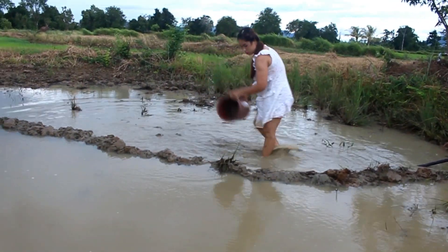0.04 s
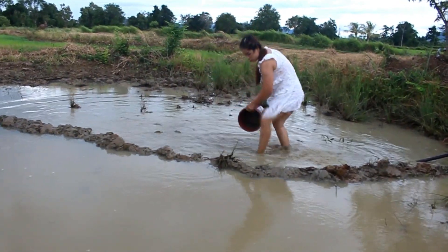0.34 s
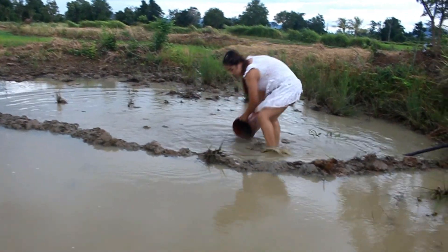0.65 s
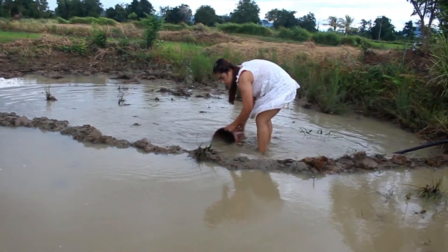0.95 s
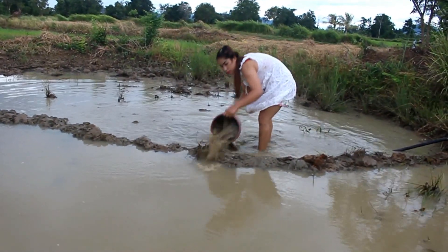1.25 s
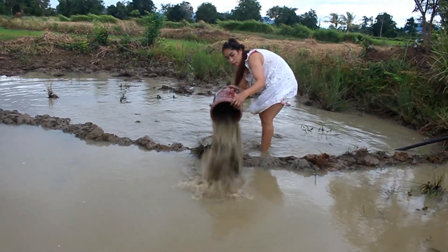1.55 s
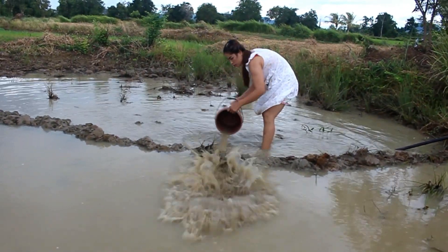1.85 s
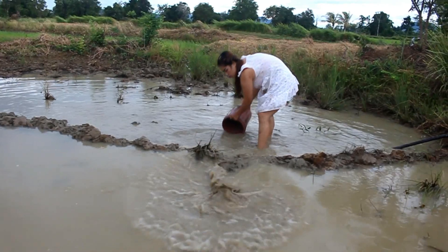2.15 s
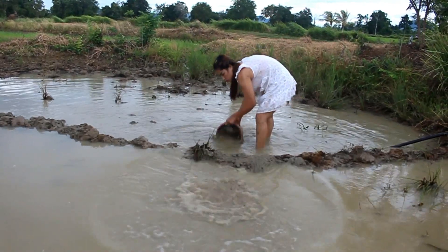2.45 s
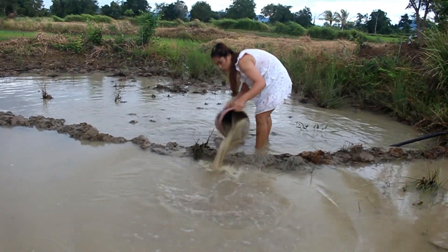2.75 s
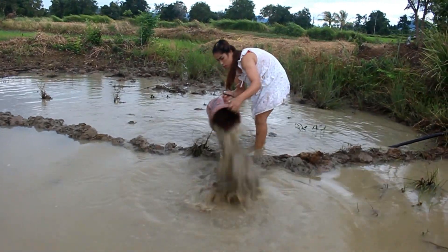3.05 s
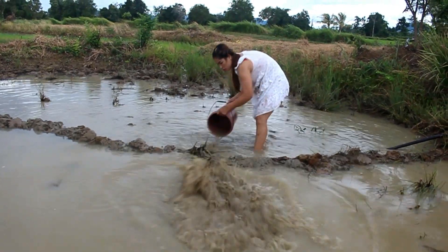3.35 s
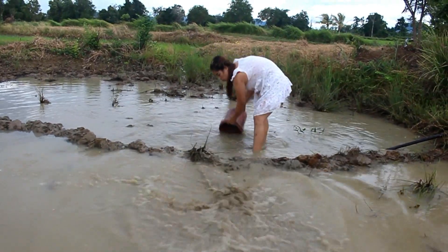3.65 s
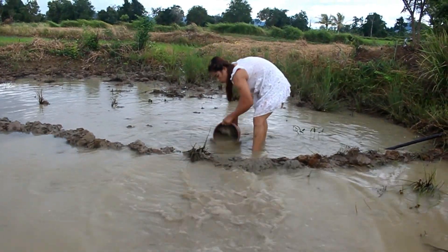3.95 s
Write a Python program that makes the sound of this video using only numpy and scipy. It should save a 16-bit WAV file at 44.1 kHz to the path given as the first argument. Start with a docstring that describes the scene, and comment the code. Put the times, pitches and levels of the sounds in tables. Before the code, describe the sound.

Water splashes down twice from a plastic bucket that knocks as it scoops, outdoors.

```python
"""Someone wades through a flooded field, the water churning and gulping, while wind buffets the microphone.
At 1.1 s a plastic bucket knocks as it is plunged in; its muddy load slides out and crashes down as
spray, slaps and bubbles. A louder knock at 2.3 s leads to a second throw, and at 3.8 s the bucket
goes in again. The recorder's gain ducks after the loud peaks of the knocks and recovers slowly."""
import sys
import numpy as np
from scipy import signal
from scipy.fft import rfft, irfft, next_fast_len
from scipy.io import wavfile

SR = 44100
rng = np.random.default_rng(int(sys.argv[2]) if len(sys.argv) > 2 else 0)


def materialize(psi):
    """Save the field psi as 16-bit PCM at rate SR to the path in sys.argv[1].

    A 1-D psi becomes a single channel; in a 2-D psi each row is a channel.
    """
    bounded = np.clip(np.atleast_2d(psi).T, -1, 1)
    quanta = np.round(bounded * 32767).astype(np.int16)
    wavfile.write(sys.argv[1], SR, quanta)


N = 176400
T = np.arange(N) / SR

# Each row: start in seconds, wall in dB, splash in dB, hollow pitch in Hz, hollow in dB,
# hollow t60 in seconds.
BUCKET_KNOCKS = [(1.1086, -9.5, -11.5, 272, -1.5, 0.045), (2.3048, 7.5, -8, 212, 0, .11),
                 (3.7933, 5.5, -14.5, 174, -3.5, 0.097)]
# Each row: delay within a knock in seconds, level in dB.
KNOCK_CONTACTS = [(0, -2.5), (.0043, 0), (.011, -6), (.017, -7.5)]
# Each row: frequency in Hz, relative level in dB, t60 in seconds.
WALL_MODES = [(878, -12.5, 0.08), (994, -17, .07), (1383, -6.5, 0.037), (1479, -3, 0.074),
              (1600, -4.5, 0.039), (1900, -7.5, 0.031), (2100, -11, 0.058), (2500, -13.5, 0.074),
              (2810, -11, 0.067), (3050, -13, .055), (3400, -9.5, 0.076), (3460, -6.5, 0.026),
              (3730, -14, 0.065), (4200, -31, 0.16)]
WALL_ROUGHNESS, FLUTTER_WIDTH_HZ = 0.32, 140
CRACK_DB, CRACK_T60_S, SPLASH_T60_S, HOLLOW_DELAY_S = 10, 0.0021, 0.092, 0.0032


def bucket():
    """Rim and side hit the water in turn: the loaded wall rings unevenly, splashes, the hollow booms."""
    out, t = np.zeros(N), T[:SR // 4]
    for start, wall_db, splash_db, hollow_hz, hollow_db, hollow_t60 in BUCKET_KNOCKS:
        for delay, contact_db in KNOCK_CONTACTS:
            wall = 0
            for hz, mode_db, t60 in WALL_MODES:
                flutter = rms_one(resonate(rng.standard_normal(len(t)), hz, FLUTTER_WIDTH_HZ))
                tone = np.sin(2 * np.pi * (hz * t + rng.random()))
                wall += from_db(mode_db) * fade(t60) * (tone + WALL_ROUGHNESS * flutter)
            splash = spatter() * (from_db(CRACK_DB) * fade(CRACK_T60_S) + fade(SPLASH_T60_S))
            contact = from_db(wall_db) * wall / 2 + from_db(splash_db) * splash
            add(out, start + delay, from_db(contact_db) * contact)
        add(out, start + HOLLOW_DELAY_S, from_db(hollow_db) * bubble(hollow_hz, hollow_t60, rise=0.015))
    return out


# Each row: frequency in Hz, relative density in dB.
SPRAY_SPECTRUM = [(400, -17), (1000, -11.5), (1600, -6), (2300, -5.5), (3400, 0), (4300, -3.5), (5300, -15),
                  (6600, -15), (8000, -9.5), (9300, -14), (12000, -26), (15500, -42)]
DROPS_DB, DROPS_PER_S, DROP_Q, DROP_SPREAD_DB, SPRAY_FLICKER_DB = -1.5, 1800, 4, 3.5, 1.32


def spray(level_db):
    """Thousands of drops ring for a few cycles each, over a smooth mist of the finest ones."""
    density = from_db((level_db - level_db.mean()) / 2)
    impacts = clicks(DROPS_PER_S * density, DROP_SPREAD_DB)
    pitches_hz = np.geomspace(900, 15000, 24)
    band = rng.integers(0, len(pitches_hz), N)
    drops = sum(resonate(impacts * (band == k), hz, hz / DROP_Q) for k, hz in enumerate(pitches_hz))
    drops = colour(drops / np.sqrt(density), SPRAY_SPECTRUM)  # same power at any density
    mist = colour(rng.standard_normal(N), SPRAY_SPECTRUM)
    return from_db(level_db + SPRAY_FLICKER_DB * drift(26)) * (from_db(DROPS_DB) * drops + mist)


def spatter():
    """A quarter second of noise with the colour of spray."""
    return colour(rng.standard_normal(SR // 4), SPRAY_SPECTRUM)


# Each row: start in seconds, level in dB, ring in Hz, t60 in seconds.
SURFACE_SLAPS = [(.1725, -23, 2030, 0.053), (.3207, -19, 1900, 0.04), (.5053, -21, 2400, 0.063),
                 (.63, -21, 1830, 0.048), (.683, -20, 3000, 0.024), (.747, -26, 3000, .04),
                 (.768, -26, 4200, .03), (.8031, -13.5, 2100, 0.035), (.822, -20.5, 9000, .05),
                 (.891, -27, 4000, .03), (.925, -31, 9000, .03), (.954, -27, 2500, .04),
                 (1.3917, -22, 2940, 0.039), (1.6402, -12, 3380, 0.059), (1.654, -12.5, 1680, 0.053),
                 (1.6651, 0.5, 3500, 0.018), (2.04, -18, 8100, 0.029), (2.238, -18.5, 3000, .07),
                 (2.3778, -19, 2460, 0.04), (2.4853, -16, 3400, 0.051), (2.563, -17, 3020, 0.077),
                 (2.7616, -15.5, 4100, 0.033), (2.856, -19.5, 3700, 0.098), (2.8918, -15, 3000, 0.043),
                 (2.906, -18, 3500, 0.021), (3.053, -17, 3400, .04), (3.0904, -11, 3400, 0.025),
                 (3.2061, -23, 2620, 0.16), (3.2879, -12, 2960, 0.056), (3.297, -10, 3400, 0.043),
                 (3.3717, -18.5, 3500, 0.084), (3.4524, -8, 2950, 0.02), (3.4619, -10, 8650, 0.019),
                 (3.862, -22, 1500, 0.11), (3.957, -23.5, 900, .06), (3.975, -24, 1600, 0.05)]
SLAP_RING_DB, SLAP_WIDTH_HZ, SLAP_ATTACK_S = -1, 430, 0.00088


def slaps():
    """Lumps of water hit the surface, each a sharp burst of spray with a short ring."""
    out = np.zeros(N)
    attack = 1 - np.exp(-T[:SR // 4] / SLAP_ATTACK_S)
    for start, db, hz, t60 in SURFACE_SLAPS:
        burst = spatter() * attack
        ring = from_db(SLAP_RING_DB) * rms_one(resonate(burst, hz, SLAP_WIDTH_HZ))
        add(out, start, from_db(db) * fade(t60) * rms_one(burst + ring))
    return out


# Each row: start in seconds, level in dB, pitch in Hz, t60 in seconds.
AIR_POCKETS = [(.182, -17, 680, 0.036), (0.2116, -15, 700, 0.031), (.278, -22.5, 600, 0.073),
               (.312, -20.5, 800, 0.043), (.488, -19.5, 870, 0.048), (.757, -21, 380, .06),
               (.862, -18.5, 660, 0.022), (1.11, -3, 440, .04), (1.1105, -3, 651, .055),
               (1.405, -23, 660, 0.1), (1.757, -16.5, 790, 0.048), (1.777, -24, 770, .06),
               (1.815, -16, 723, 0.052), (1.823, -9, 276, 0.037), (1.83, -14, 391, 0.073),
               (2.03, -18.5, 800, 0.05), (2.565, -11, 765, 0.044), (2.583, -13, 610, 0.037),
               (2.59, -23, 392, 0.077), (2.607, -20, 895, 0.075), (3.215, -19, 820, 0.057),
               (3.247, -18.5, 420, .06), (3.28, -16, 823, 0.064), (3.41, -20, 640, 0.06),
               (3.526, -19, 412, 0.045), (3.56, -20.5, 784, 0.047), (3.619, -18.5, 447, .08),
               (3.652, -14, 340, .08)]
GULP_RISE, GULP_SLOSH_DB, GULP_WIDTH_HZ = 0.1, -8, 310


def gulps():
    """Big bubbles ring behind the legs, the bucket and the falling water, each in a short slosh."""
    out = np.zeros(N)
    for start, db, hz, t60 in AIR_POCKETS:
        add(out, start, from_db(db) * bubble(hz, t60, GULP_RISE))
        band = resonate(rng.standard_normal(SR // 4), hz, GULP_WIDTH_HZ)
        slosh = rms_one(resonate(band, hz, GULP_WIDTH_HZ))
        add(out, start, from_db(db + GULP_SLOSH_DB) * slosh * fade(1.38 * t60))
    return out


# Each row: frequency in Hz, relative density in dB.
SLOSH_SPECTRUM = [(150, -15.5), (300, -5.5), (480, -5.5), (720, 1), (920, 1), (1150, -6), (1500, -1),
                  (2100, -14), (3500, -23.5), (15000, -53)]
SLOSH_FLICKER_DB = 2.5
BUBBLES_DB, BUBBLES_PER_S, BUBBLE_RANGE_DB = -7.5, 260, 18
BUBBLE_LOW_HZ, BUBBLE_HIGH_HZ, BUBBLE_T60_CYCLES, BUBBLE_RISE = 600, 2200, 28, 0.19


def churning(level_db):
    """Stirred water sloshes and traps small bubbles."""
    slosh = colour(rng.standard_normal(N), SLOSH_SPECTRUM) * from_db(SLOSH_FLICKER_DB * drift(29))
    bubbles = np.zeros(N)
    for when, pitch, softness in rng.random((int(BUBBLES_PER_S * N / SR), 3)):
        hz = BUBBLE_LOW_HZ * (BUBBLE_HIGH_HZ / BUBBLE_LOW_HZ) ** pitch
        ring = bubble(hz, BUBBLE_T60_CYCLES / hz, BUBBLE_RISE)
        add(bubbles, when * N / SR, from_db(-BUBBLE_RANGE_DB * softness) * ring)
    return from_db(level_db) * (slosh + from_db(BUBBLES_DB) * rms_one(bubbles))


DROPLETS_DB, DROPLETS_PER_S, DROPLET_RANGE_DB = -8.5, 170, 36
DROPLET_LOW_HZ, DROPLET_HIGH_HZ, DROPLET_T60_CYCLES = 1406, 9420, 33


def droplets(level_db):
    """Single drops stand out of the spray as tiny rising pings."""
    pings = np.zeros(N)
    for when, pitch, softness in rng.random((int(DROPLETS_PER_S * N / SR), 3)):
        hz = DROPLET_LOW_HZ * (DROPLET_HIGH_HZ / DROPLET_LOW_HZ) ** pitch
        ping = hz * bubble(hz, DROPLET_T60_CYCLES / hz, BUBBLE_RISE)  # weighted toward the treble
        add(pings, when * N / SR, from_db(-DROPLET_RANGE_DB * softness) * ping)
    return from_db(DROPLETS_DB + level_db) * colour(pings, SPRAY_SPECTRUM)


# Each row: centre in seconds, Gaussian sigma in seconds, level in dB.
SHEET_SWELLS = [(.36, 0.16, -44.5), (0.826, 0.027, -37), (1.35, 0.08, -36), (1.662, 0.045, -32.5),
                (2.04, 0.029, -34), (2.54, 0.016, -34), (2.72, 0.063, -35.5), (2.866, 0.034, -30.5),
                (3.06, 0.034, -33.5), (3.242, .07, -30.5)]
# Each row: frequency in Hz, relative density in dB.
FIZZ_SPECTRUM = [(2500, -22), (5000, -13), (6500, -6), (8200, 6.5), (10000, -3.5), (12500, -11.5),
                 (15500, -33)]
FIZZ_PER_S, FIZZ_SPREAD_DB, FIZZ_FLICKER_DB = 1400, 1.5, 2.9


def sheets():
    """Water runs off rim and legs or fans out in thin sheets that tear into fine, bright crackle."""
    swell = sum(from_db(db) * np.exp(-.5 * ((T - centre) / sigma) ** 2)
                for centre, sigma, db in SHEET_SWELLS)
    fizz = colour(clicks(FIZZ_PER_S, FIZZ_SPREAD_DB), FIZZ_SPECTRUM)
    return swell * fizz * from_db(FIZZ_FLICKER_DB * drift(40))


# Each row: time in seconds, rumble level in dB.
WIND_LEVELS = [(0, -29), (.04, -26), (.25, -31), (.34, -33), (.47, -33.5), (.78, -22), (.88, -31.5),
               (1.06, -20.5), (1.16, -30.5), (1.8, -31), (2.29, -31), (2.39, -35.5), (2.5, -28.5),
               (2.77, -28), (2.87, -35), (3.29, -25.5), (3.4, -30), (3.52, -23), (3.85, -22.5), (4.0, -26)]
# Each row: frequency in Hz, relative density in dB.
RUMBLE_SPECTRUM = [(20, -27), (40, -5), (62, -1.5), (115, 0.5), (160, -6), (250, -9), (400, -21),
                   (800, -30), (2000, -36), (15000, -90)]
# Each row: centre in seconds, peak in dB, pitch in Hz, length in seconds.
WIND_EDDIES = [(0.046, -13.5, 129, .012), (0.067, -12, 75, 0.023), (.165, -15.5, 110, 0.031),
               (.238, -14, 95, 0.02), (0.336, -19.5, 50.3, .03), (0.684, -20, 122, 0.022),
               (.765, -18.5, 184, 0.018), (0.795, -18, 130, 0.018), (1.035, -14.5, 103, .026),
               (1.077, -18.5, 140, 0.026), (3.473, -10, 151, 0.0033), (3.493, -11.5, 137, 0.016),
               (3.538, -11, 201, 0.023), (3.572, -14, 164, 0.0085), (3.599, -10, 160, 0.0076),
               (3.626, -9.5, 251, 0.0074), (3.634, -5.5, 140, 0.01), (3.66, -19.5, 332, 0.023),
               (3.69, -29, 260, .02), (3.764, -16, 298, 0.00875), (3.776, -9.5, 178, 0.0072),
               (3.985, -19, 212, 0.025)]
WIND_TRIM_DB, WIND_FLICKER_DB = 0.5, 1.5


def wind():
    """Lumpy rumble, with single eddies that briefly thump the microphone."""
    level_db = WIND_TRIM_DB + np.interp(T, *np.transpose(WIND_LEVELS))
    out = colour(rng.standard_normal(N), RUMBLE_SPECTRUM)
    out *= from_db(level_db + WIND_FLICKER_DB * drift(36))
    for centre, db, hz, length in WIND_EDDIES:
        t = T[:int(4 * length * SR)] - 2 * length
        eddy = np.sin(2 * np.pi * (hz * t + rng.random()) + .5 * drift(90)[:len(t)])
        add(out, centre - 2 * length, from_db(db) * eddy * np.exp(-2 * (t / length) ** 2))
    return out


def bubble(hz, t60, rise):
    """A dying sine whose pitch rises as the air nears the surface."""
    t = T[:int(min(t60, .25) * SR)]
    tone = np.sin(2 * np.pi * hz * t * (1 + rise * t / t60))
    attack = 1 - np.exp(-2 * hz * t)
    return tone * attack * np.exp(-np.log(1000) * t / t60)


def clicks(per_s, spread_db):
    """Impulses of random time, size and sign."""
    hits = rng.random(N) < per_s / SR
    sizes = from_db(spread_db * np.minimum(rng.exponential(1, N), 4))
    return hits * sizes * rng.choice([-1, 1], N)


def resonate(x, hz, width_hz):
    """Two-pole resonance with unit peak gain."""
    r = np.exp(-np.pi * width_hz / SR)
    feedback = [1, -2 * r * np.cos(2 * np.pi * hz / SR), r * r]
    return signal.lfilter(np.array([1, 0, -1]) * (1 - r * r) / 2, feedback, x + 1e-18)


def colour(x, spectrum):
    """Minimum-phase filter through the points of a spectrum; output at unit power."""
    size = 2 * next_fast_len(len(x))
    hz, db = np.transpose(spectrum)
    bins_hz = np.arange(size // 2 + 1) * SR / size
    log_gain = np.log(from_db(np.interp(np.log(bins_hz + 1), np.log(hz), db)))
    cepstrum = irfft(log_gain)[:size // 2]
    response = np.exp(2 * rfft(cepstrum, size) - cepstrum[0])
    return rms_one(irfft(rfft(x, size) * response)[:len(x)])


def drift(corner_hz):
    """Slow random motion of spread 1."""
    step, settle = 40, 2000
    r = np.exp(-2 * np.pi * corner_hz * step / SR)
    noise = rng.standard_normal(N // step + settle + 2)
    slow = signal.lfilter([1], [1, -2 * r, r * r], noise)[settle:]
    return np.interp(np.arange(N) / step, np.arange(len(slow)), rms_one(slow))


def fade(t60):
    """A quarter second of exponential decay."""
    return np.exp(-np.log(1000) * T[:SR // 4] / t60)


def from_db(db):
    """Decibels to gain."""
    return 10 ** (np.asarray(db) / 20)


def rms_one(x):
    """Scale to unit power."""
    return x / np.sqrt(np.mean(x ** 2) + 1e-20)


def add(out, start_s, sound):
    """Mix a sound in at a time."""
    i = max(int(start_s * SR), 0)
    out[i:i + len(sound)] += sound[:max(N - i, 0)]


# Agitation of the water from knock to knock. Each row: time in seconds, spray in dB, churning in dB.
WADING_LEVELS = [(0.0, -40, -34.5), (0.066, -36, -36), (0.138, -44, -37), (0.182, -31, -34.5),
                 (0.23, -41, -33.5), (0.85, -36, -37.5), (0.932, -41, -40.5), (1.016, -31, -33),
                 (1.09, -30, -37.5)]
FIRST_THROW_LEVELS = [(1.15, -38, -36), (1.238, -36, -44.5), (1.248, -30.5, -40), (1.418, -24.5, -30),
                      (1.52, -31, -34.5), (1.606, -27.5, -38), (1.66, -20.5, -30), (1.676, -20.5, -39.5),
                      (1.766, -26, -24.5), (2.012, -23.5, -28), (2.29, -34.5, -34.5)]
SECOND_THROW_LEVELS = [(2.36, -41.5, -34), (2.556, -29, -34.5), (2.564, -24.5, -24), (2.64, -34.5, -34),
                       (2.718, -28, -37.5), (2.846, -36, -32), (2.908, -20, -36), (2.94, -32.5, -36.5),
                       (3.04, -21.5, -37), (3.068, -26, -29), (3.166, -27.5, -33), (3.21, -18.5, -22),
                       (3.644, -32, -38), (3.724, -30.5, -58), (3.78, -36, -41)]
REFILL_LEVELS = [(3.85, -51.5, -60), (3.984, -34.5, -33.5), (4.0, -45, -39)]


def scene():
    """Water, bucket and wind in the open air, in mono."""
    agitation = np.vstack([WADING_LEVELS, FIRST_THROW_LEVELS, SECOND_THROW_LEVELS, REFILL_LEVELS])
    times, spray_db, churn_db = agitation.T
    spray_db, churn_db = np.interp(T, times, spray_db), np.interp(T, times, churn_db)
    water = spray(spray_db) + droplets(spray_db) + sheets() + churning(churn_db) + slaps() + gulps()
    return (water + bucket() + wind())[None]


DUCK_ABOVE_DB, RECOVER_DB_PER_S, DUCK_ATTACK_S = -1.5, 45.5, 0.0028
CLIP_LEVEL, CUTOFF_HZ = .92, 15500


def record(dry):
    """The gain ducks after loud peaks and recovers slowly; a soft clip and a low-pass follow."""
    over_db = np.maximum(20 * np.log10(np.abs(dry[0]) + 1e-9) - DUCK_ABOVE_DB, 0)
    held_db = np.maximum.accumulate(over_db + RECOVER_DB_PER_S * T) - RECOVER_DB_PER_S * T
    r = np.exp(-1 / (DUCK_ATTACK_S * SR))
    ducked = dry * from_db(-signal.lfilter([1 - r], [1, -r], held_db))
    clipped = ducked / (1 + (ducked / CLIP_LEVEL) ** 6) ** (1 / 6)
    return signal.sosfilt(signal.ellip(12, .1, 100, CUTOFF_HZ, fs=SR, output="sos"), clipped)


dry = scene()
out = record(dry)
materialize(out)
```